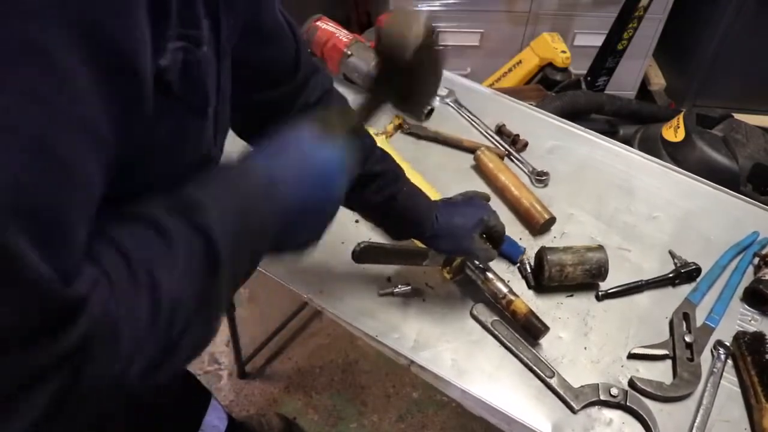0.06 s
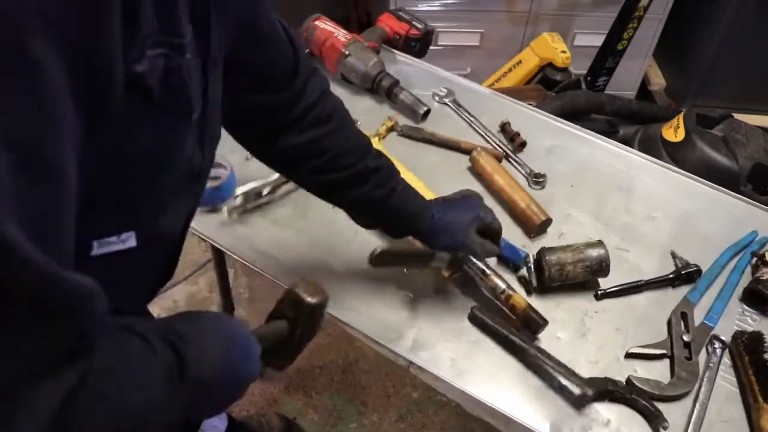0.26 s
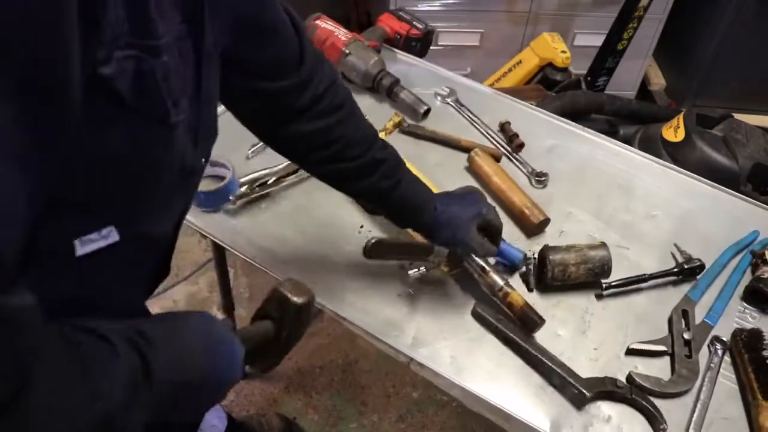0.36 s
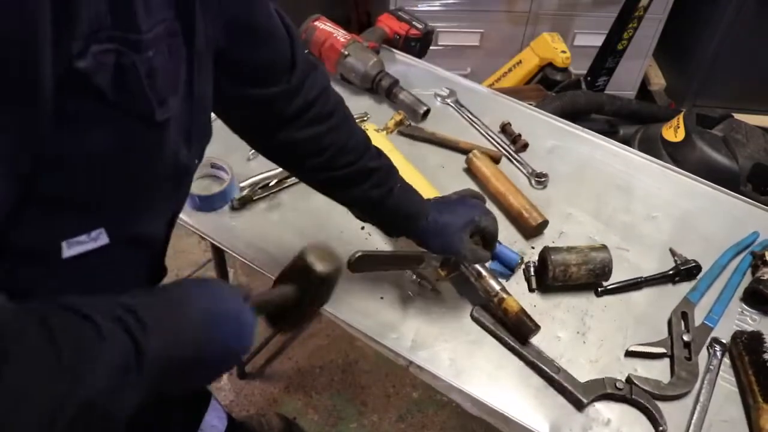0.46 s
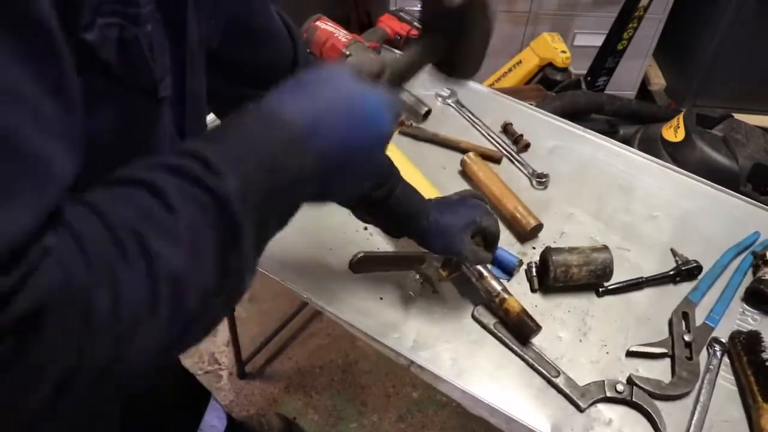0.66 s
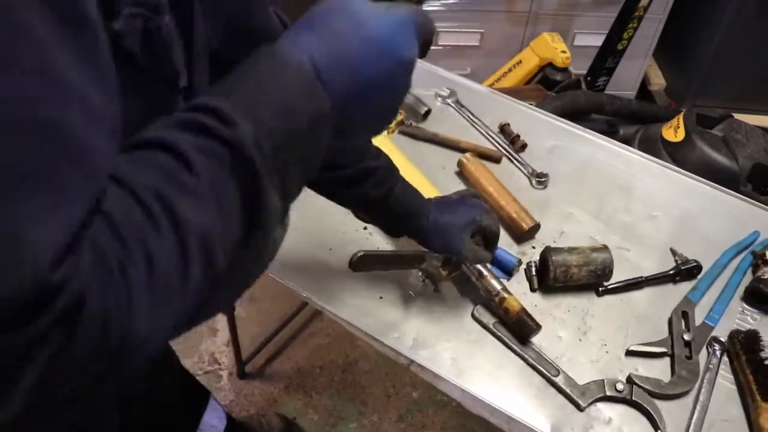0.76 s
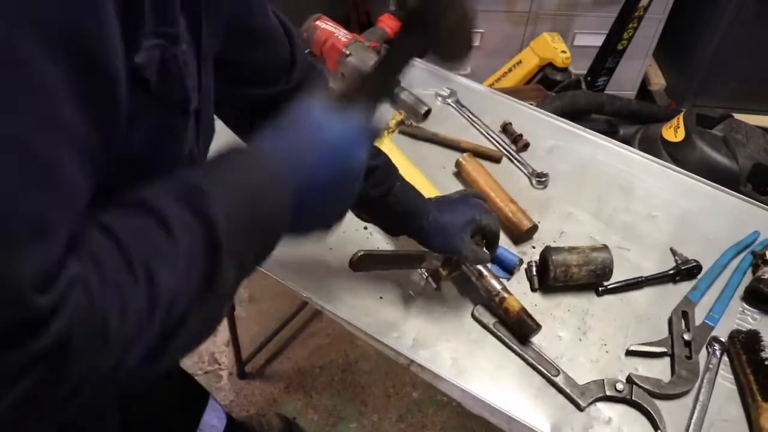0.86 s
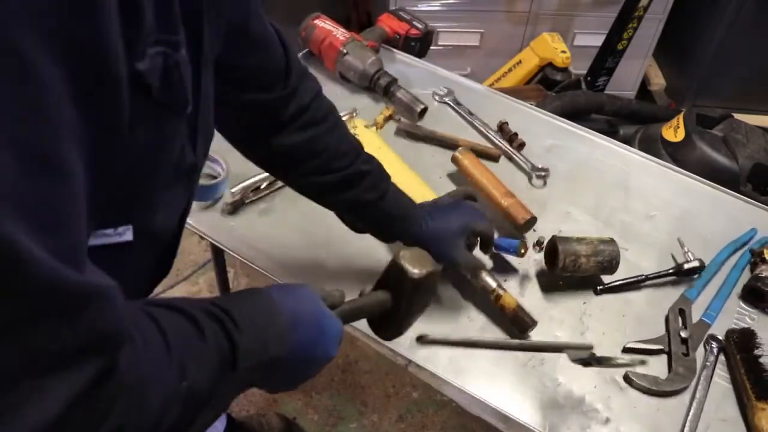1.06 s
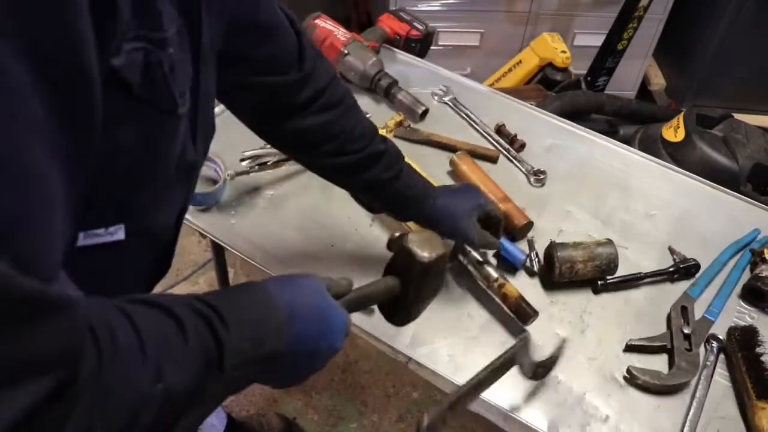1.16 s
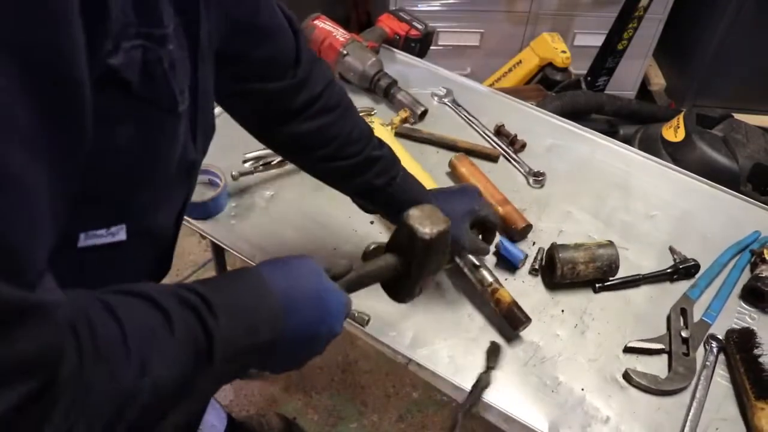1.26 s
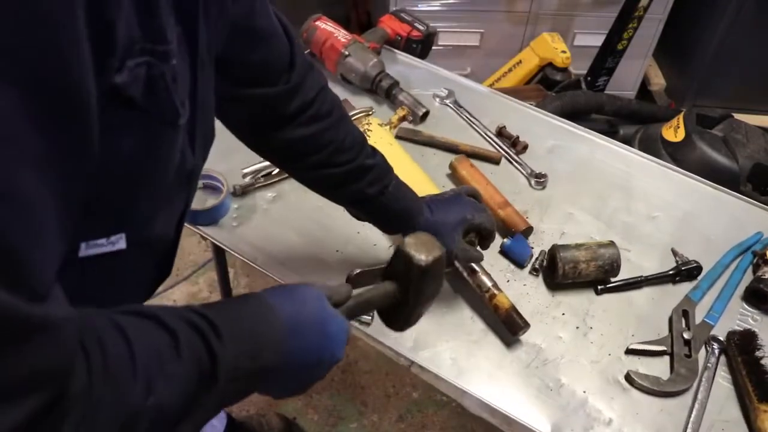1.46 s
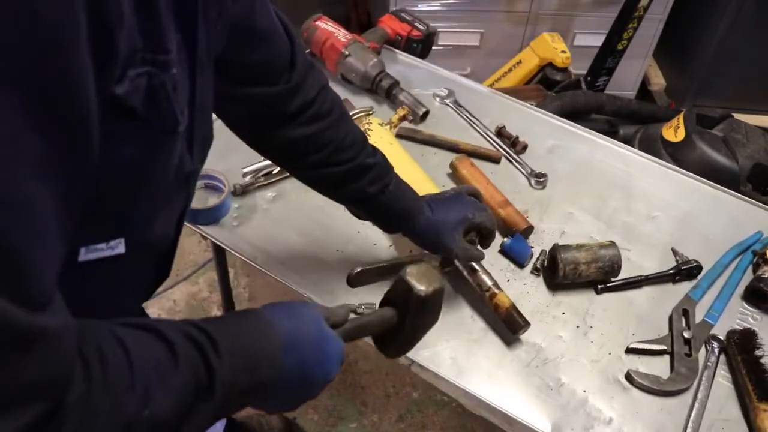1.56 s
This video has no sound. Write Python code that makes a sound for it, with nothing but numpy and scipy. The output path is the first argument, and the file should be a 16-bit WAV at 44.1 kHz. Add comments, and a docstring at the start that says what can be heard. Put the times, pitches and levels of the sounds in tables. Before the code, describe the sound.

Two very loud hammer blows on a steel wrench, close and overloaded, about a second apart; each rings briefly and sets loose tools rattling, thudding and clinking across a metal bench in a lightly echoing workshop.

```python
"""Two hammer blows on a steel bench

A small sledgehammer hits a steel wrench twice on a sheet-steel bench, close to an input that overloads.
A blow is shaped noise with ringing modes. It throws up loose tools, which rattle (random contacts exciting
dense sheet modes), thud and clink (decaying sine modes) and tick (short noise bursts).
A decaying-noise echo and steady coloured noise make the workshop around them."""
import sys
import numpy as np
from scipy import signal
from scipy.fft import rfft, irfft, next_fast_len
from scipy.io import wavfile
from scipy.ndimage import map_coordinates

SR = 44100
rng = np.random.default_rng(int(sys.argv[2]) if len(sys.argv) > 2 else 0)


def master(y):
    """Save y as 16-bit WAV."""
    cut = np.clip(np.atleast_2d(y).T, -1, 1)
    pcm = np.round(cut * 32767)  # scale
    wavfile.write(sys.argv[1], SR, pcm.astype(np.int16))


def amplitude_ratio(level_db):
    """Convert a level in decibels to the matching linear amplitude (field) ratio."""
    exponent = np.asarray(level_db, float) / 20
    return 10 ** exponent


N = 70560

# hammer blows: start_s, level_db
BLOW_TIMES = [(0.2181, 0.5), (1.0407, 1.5)]
# noise spectrum of sheet and tools crashing: frequency_hz, relative_density_db
CRASH_SPECTRUM = [(60, -5), (110, -19), (180, 1.5), (550, -7), (1180, -1.5), (2430, -2.5), (5760, -10),
                  (8000, -12.5), (15700, -33)]
# noise spectrum of steel on steel: frequency_hz, relative_density_db
CRACK_SPECTRUM = [(800, -30), (2500, 1.5), (6500, -5.5), (9000, -29), (14000, -9), (16000, -32)]
# bench modes under the blow: pitch_hz, level_db, t60_s
PUSH_MODES = [(152, -3, 0.054), (190.4, 5, 0.04), (451.7, -8, 0.069), (657, -8.5, 0.066),
              (1165, -12, 0.083)]
# wrench modes: pitch_hz, level_db, t60_s
WRENCH_MODES = [(1260, -4, 0.35), (1325, 12.5, 0.17), (2270, 17.5, 0.22), (2700, -8, .13), (3130, -8, 0.21),
                (3430, -10, .25), (5370, -21, .6), (5900, -32, .3), (7424, -24, .28), (8600, -20, .2)]
# how hard the loose tools rattle: time_s, level_db
RATTLE_LEVEL = [(0, -46), (.045, -52), (0.058, -39), (.11, -72), (0.147, -36.5), (.2, -53.5), (.22, -62),
                (.26, -22), (.31, -27.5), (.35, -23), (.39, -19), (.425, -17), (.46, -24), (.49, -23),
                (.52, -19), (.56, -22.5), (.6, -24.5), (0.636, -22), (.68, -26), (.72, -26.5), (.77, -28.5),
                (0.796, -35.5), (.835, -33), (.865, -35), (.89, -39), (0.919, -45.5), (.944, -39),
                (0.957, -30.5), (0.982, -29.5), (1.001, -40), (1.04, -34), (1.08, -56), (1.12, -30),
                (1.175, -27.5), (1.199, -22), (1.23, -17.5), (1.268, -21), (1.305, -23), (1.334, -18.5),
                (1.358, -26), (1.408, -21), (1.47, -24), (1.53, -24), (1.6, -25.5)]
# noise spectrum of a tool contact: frequency_hz, relative_density_db
CONTACT_SPECTRUM = [(150, -49), (250, -40), (313, -8.5), (626, -14), (1190, -10), (4060, -12.5),
                    (5360, -17.5), (7440, -20.5), (9650, -24), (14100, -36.5), (15700, -52)]
# decay of the dense sheet modes: frequency_hz, t60_s
SHEET_DECAY = [(200, .1), (1000, .045), (4000, .03), (12000, .018)]
# heavy tools landing on the sheet: start_s, level_db
THUD_TIMES = [(0.048, -39.5), (0.139, -54), (0.368, -19), (0.404, -19), (0.43, -25), (0.494, -14.5),
              (0.513, -13.5), (0.538, -19), (0.62, -16), (0.659, -25), (0.712, -16), (0.758, -19),
              (0.83, -28.5), (0.953, -26), (1.194, -24), (1.22, -14.5), (1.242, -18.5), (1.271, -15),
              (1.309, -14.5), (1.329, -43), (1.388, -41), (1.449, -31), (1.509, -25), (1.567, -24.5)]
# low modes of the bench: pitch_hz, level_db, t60_s
BENCH_MODES = [(116.6, 8.5, 0.1), (135.3, 8.5, 0.07), (196, 3.5, 0.096), (218.7, 3.5, 0.093),
               (306.3, -2, .25), (349.8, -3.5, 0.11), (455.8, -1, 0.13), (543.7, -3.5, 0.12)]
# small steel parts clinking: start_s, level_db
CLINK_TIMES = [(0.1266, -47), (0.3586, -15), (0.396, -17), (0.4174, -16), (0.4913, -17), (0.5033, -17),
               (0.5544, -23), (0.8244, -42), (0.9737, -34), (1.1984, -21), (1.3329, -8), (1.3884, -19),
               (1.4444, -21)]
# modes of the small parts: pitch_hz, level_db, t60_s
PART_MODES = [(4975, -13, .12), (6050, -7, .09), (6720, -5, .05), (7300, -2, .06), (7800, -5, .06),
              (8350, -6, .04), (8900, -8, .04), (9250, -7, .04), (9520, -4, .06), (10100, -9, .03),
              (10600, -9, .03), (12000, -12, .03)]
# ticks of hard edges: start_s, level_db
TICK_TIMES = [(0.0464, -43), (0.1411, -23), (0.4112, -5.5), (0.4184, -5), (0.535, -9.5), (0.6984, -36),
              (0.7367, -47), (0.9482, -25), (1.19, -18), (1.33, -19), (1.487, -21), (1.508, -3.5)]
# noise spectrum of a tick: frequency_hz, relative_density_db
EDGE_SPECTRUM = [(300, -13), (1500, 2), (3000, 2), (8000, -4), (14000, -10.5), (16000, -23)]
# noise spectrum the shop returns: frequency_hz, relative_density_db
WALL_SPECTRUM = [(50, -22), (120, -2), (3000, -2), (12000, -3)]
# decay of the shop's echo: frequency_hz, t60_s
ROOM_DECAY = [(200, 0.63), (2000, 0.92), (10000, 0.75)]
# noise spectrum of the shop's air: frequency_hz, relative_density_db
SHOP_SPECTRUM = [(24, -51), (40, -53), (106, 9.5), (303, 4.5), (708, -6), (1320, -2), (1420, -4),
                 (11900, -31), (15700, -30)]
# correlation of left and right noise: frequency_hz, likeness
LIKENESS = [(100, 1), (500, 0.87), (2000, 0.48), (4000, 0.49), (5700, 0.13), (8000, 1), (12000, 1)]
# level difference of the two ports: frequency_hz, left_over_right_db
PORT_BALANCE = [(60, -3.5), (110, 1.5), (200, -1), (380, 0), (700, 1.5), (1290, 0.0), (2380, -3),
                (4400, -2), (8120, 0.5), (15000, -2)]
# phase difference of the two ports: frequency_hz, left_lead_rad
PORT_LEAD = [(100, 0), (500, -.1), (1120, -.25), (2000, -.75), (3000, -1.1), (4700, -1.2), (7000, -.2),
             (15400, -.5)]

BENCH_RISE_S = 0.0076  # time constant of a soft landing on the bench


def unit(x):
    """Normalization to unit root mean square."""
    return x / np.sqrt(np.mean(x ** 2) + 1e-20)


def along(points, hz):
    """Interpolation of (frequency_hz, value) points on a logarithmic frequency axis."""
    f, v = np.transpose(points)
    return np.interp(np.log(hz + 1), np.log(f + 1), v)


def filtered(x, response):
    """Linear filtering: the spectrum is multiplied by a complex response of frequency."""
    m = next_fast_len(x.shape[-1] + 8192)
    hz = np.fft.rfftfreq(m, 1 / SR)
    return irfft(rfft(x, m) * response(hz), m)[..., :x.shape[-1]]


def stereo_noise(spectrum, size):
    """Partial coherence: independent mid and side noises set the likeness of left and right; rms 1."""
    def response(hz):
        angle = np.arccos(np.clip(along(LIKENESS, hz), -1, 1)) / 2
        return amplitude_ratio(along(spectrum, hz)) * [np.cos(angle), np.sin(angle)]

    mid, side = filtered(rng.standard_normal((2, size)), response)
    return unit(np.array([mid + side, mid - side]))


def dying(noise, t60s):
    """Frequency-dependent damping: each band of a noise decays at its own rate; left energy 1."""
    hz, t, z = signal.stft(noise, SR, nperseg=128)
    decay = amplitude_ratio(-60 * t / along(t60s, hz)[:, None])
    tail = signal.istft(z * decay, SR, nperseg=128)[1]
    return tail / np.linalg.norm(tail[0])


def ring(modes, rise_s, spread_db, scatter):
    """Modal superposition: damped sines, with random level offsets and relative pitch offsets."""
    t = np.arange(SR // 2) / SR
    hz, db, t60 = np.transpose(modes)[:, :, None]
    db_off, detune = rng.standard_normal((2, len(modes), 1))
    envelope = amplitude_ratio(db + spread_db * db_off - 60 * t / t60)
    waves = np.sin(2 * np.pi * hz * (1 + scatter * detune) * t)
    return (envelope * waves).sum(0) * (1 - np.exp(-t / rise_s))


def played(rows, stroke):
    """Superposition in time: a new stroke is added at every (start_s, level_db) row."""
    out = np.zeros((2, N + SR))
    for s, db in rows:
        x = stroke()
        out[:, round(s * SR):][:, :x.shape[-1]] += amplitude_ratio(db) * x
    return out[:, :N]


def blow():
    """Impact: a bright crack and a broad crash die fast while bench and wrench vibrate in their modes."""
    hold_s, crash_t60_s, crash_rise_s = 0.0047, 0.072, 0.0009
    crack_t60_s = 0.015
    t = np.arange(SR // 2) / SR
    crash = stereo_noise(CRASH_SPECTRUM, len(t))
    crash = crash * amplitude_ratio(-60 * np.maximum(t - hold_s, 0) / crash_t60_s) * (1 - np.exp(-t / crash_rise_s))
    crack = stereo_noise(CRACK_SPECTRUM, len(t)) * amplitude_ratio(-60 * t / crack_t60_s)
    push = amplitude_ratio(9) * ring(PUSH_MODES, 0.0082, spread_db=0, scatter=0.014)
    wrench = amplitude_ratio(-32.5) * ring(WRENCH_MODES, .0005, spread_db=8, scatter=0.00097)
    return amplitude_ratio(5.5) * (crash + crack) + push + wrench


def rattle():
    """Random impulse excitation: contacts of scattered size strike six spots, each with its own response."""
    contacts_per_s, size_spread_db, spots = 2500, 2.5, 6
    swell_db, swell_points_per_s, rumble_db = .5, 40, -8
    count = int(contacts_per_s * N / SR)
    when, size, spot, sign = rng.random((count, 4)).T
    # the log makes large contacts rare; half of all contacts push the other way
    sizes = amplitude_ratio(-size_spread_db * np.log(size + .003)) * np.sign(sign - .5)
    sheet, rumble = np.zeros((2, N)), np.zeros(N)
    for k in range(spots):
        here = (spot * spots).astype(int) == k
        hits = np.bincount((when[here] * N).astype(int), sizes[here], N)
        response = dying(stereo_noise(CONTACT_SPECTRUM, SR // 4), SHEET_DECAY)
        sheet += signal.fftconvolve(hits[None], response, axes=1)[:, :N]
        low_modes = ring(BENCH_MODES, BENCH_RISE_S, spread_db=0, scatter=0.0013)
        rumble += signal.fftconvolve(hits, low_modes)[:N]
    t = np.arange(N) / SR
    swell = map_coordinates(rng.standard_normal(80), [t * swell_points_per_s])
    level_db = np.interp(t, *np.transpose(RATTLE_LEVEL)) + swell_db * swell
    return (unit(sheet) + amplitude_ratio(rumble_db) * unit(rumble)) * amplitude_ratio(level_db)


def thud():
    """Soft impact: a heavy tool's gradual contact excites the low modes of the bench."""
    return amplitude_ratio(-8) * ring(BENCH_MODES, BENCH_RISE_S, spread_db=3, scatter=0.017)


def clink():
    """Repeated contact: a small part chatters in four quick touches, each on slightly detuned modes."""
    chatter_s = .008
    late = (rng.random(4) * chatter_s * SR).astype(int) * [0, 1, 1, 1]  # the first is on time
    touches = [np.roll(ring(PART_MODES, 0.00015, spread_db=2, scatter=.005), d) for d in late]
    return amplitude_ratio(-14.5) * sum(touches)


def tick():
    """Hard-edge impact: a broadband burst decays within milliseconds."""
    t60_s = 0.016
    t = np.arange(SR // 10) / SR
    return stereo_noise(EDGE_SPECTRUM, len(t)) * amplitude_ratio(-9.5 - 60 * t / t60_s)


def shop_echo(bench):
    """Reverberation: the delayed mono sound is convolved with exponentially decaying noise."""
    walls = dying(stereo_noise(WALL_SPECTRUM, SR // 2), ROOM_DECAY)
    delayed = np.pad(bench.mean(0), (500, 0))  # 500 samples, about 11 ms
    return amplitude_ratio(-19.5) * signal.fftconvolve(delayed[None], walls, axes=1)[:, :N]


def shop_air():
    """Stationary background: steady coloured noise stands for the shop's air."""
    return amplitude_ratio(-40) * stereo_noise(SHOP_SPECTRUM, N)


def scene():
    """Linear superposition: all bench sources, their echo and the shop's air add."""
    bench = played(BLOW_TIMES, blow) + rattle() + played(THUD_TIMES, thud)
    bench += played(CLINK_TIMES, clink) + played(TICK_TIMES, tick)
    return bench + shop_echo(bench) + shop_air()


def ports(x):
    """Two-port reception: the ports differ in level and phase, and both cut the deep bass."""
    low_cut_hz = 60
    side = np.array([[.5], [-.5]])  # left, right

    def response(hz):
        low_cut = (1j * hz / (low_cut_hz + 1j * hz)) ** 2
        lead = np.exp(1j * (side + .5) * along(PORT_LEAD, hz))  # turns the left only
        return low_cut * amplitude_ratio(side * along(PORT_BALANCE, hz)) * lead

    return filtered(x, response)


def overload(x):
    """Saturation: a smooth, memoryless limit bends the peaks of the waveform towards a ceiling."""
    ceiling, hardness = 0.97, 8
    return x / (1 + np.abs(x / ceiling) ** hardness) ** (1 / hardness)


def roll_off(x):
    """The treble ends steeply here."""
    return signal.sosfilt(signal.butter(12, 15820, fs=SR, output="sos"), x)


def record(dry):
    """Signal chain: the ports receive the sound, then the input overloads."""
    mix = overload(ports(dry))
    return roll_off(mix)


dry = scene()
out = record(dry)
master(out)
```